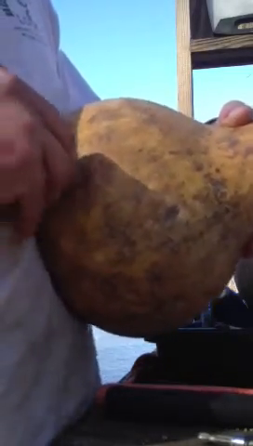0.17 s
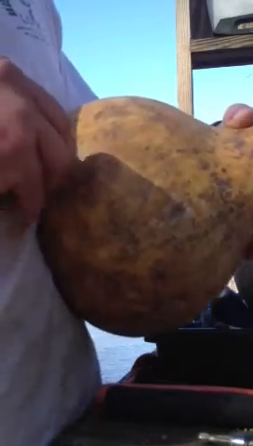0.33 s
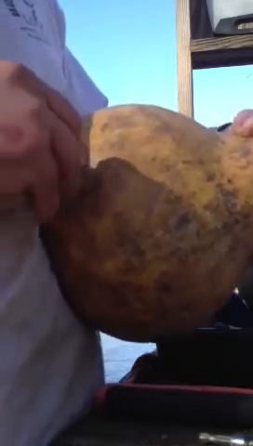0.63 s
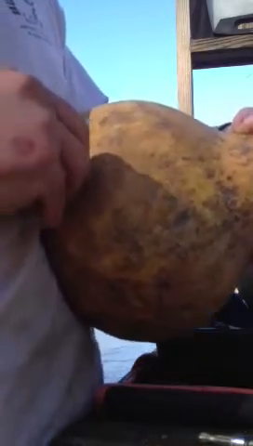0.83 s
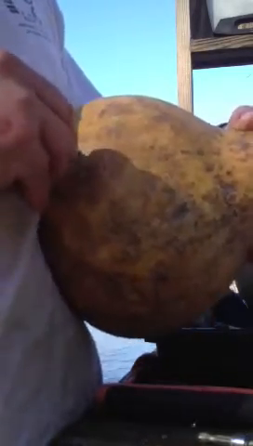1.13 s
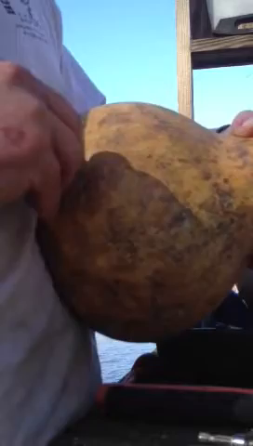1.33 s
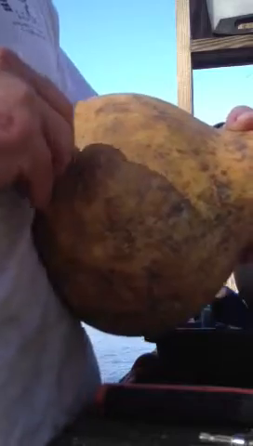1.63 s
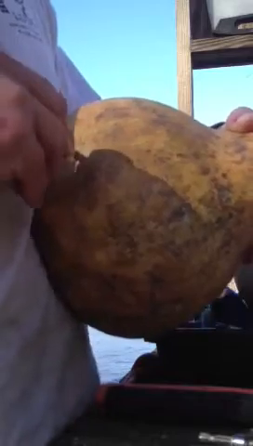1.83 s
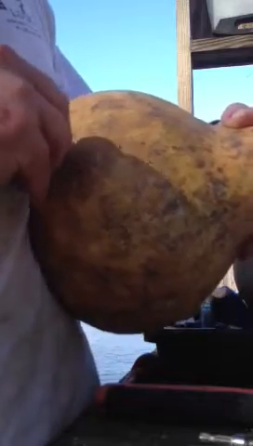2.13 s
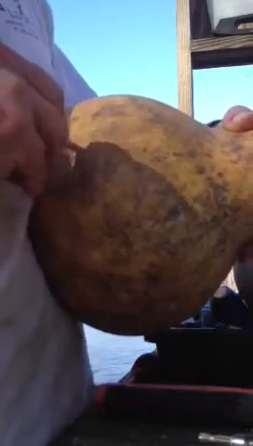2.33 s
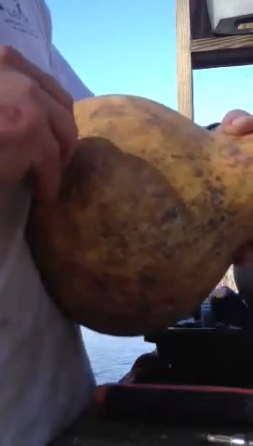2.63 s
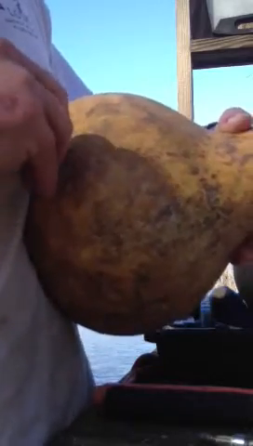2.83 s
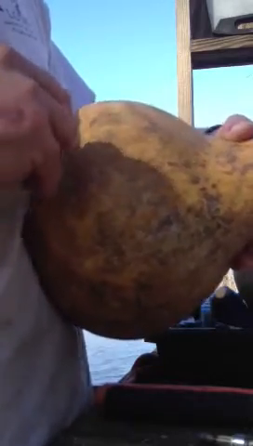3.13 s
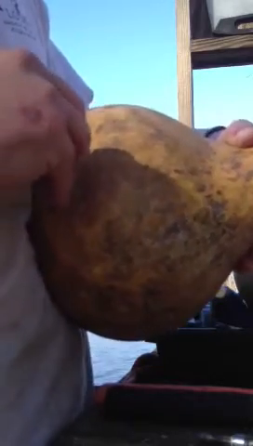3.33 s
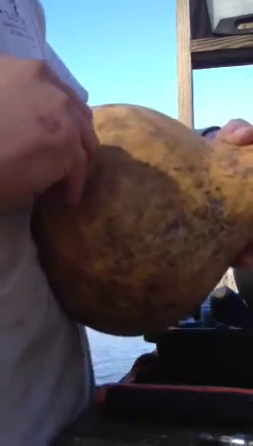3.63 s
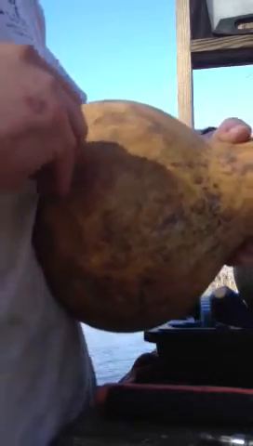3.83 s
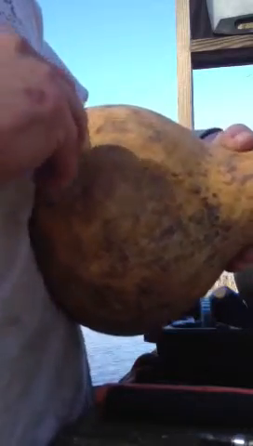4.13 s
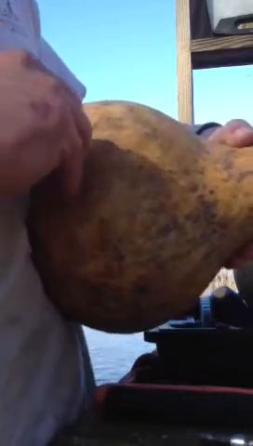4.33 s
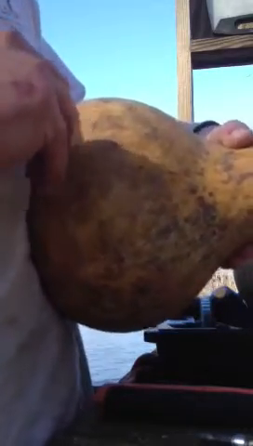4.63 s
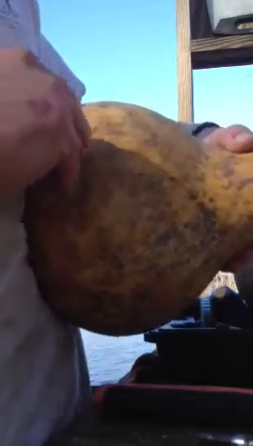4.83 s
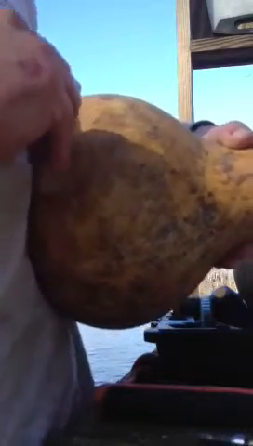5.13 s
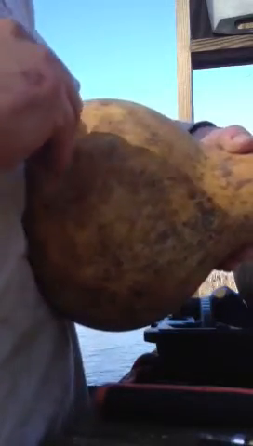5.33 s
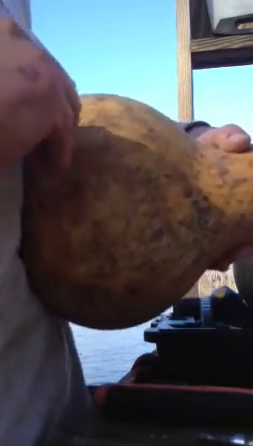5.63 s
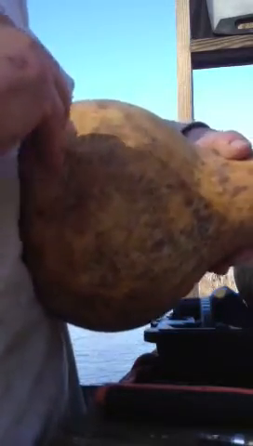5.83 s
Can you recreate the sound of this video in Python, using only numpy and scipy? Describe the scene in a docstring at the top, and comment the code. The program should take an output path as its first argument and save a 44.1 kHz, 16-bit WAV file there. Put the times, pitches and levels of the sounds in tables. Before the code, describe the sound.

A thin saw blade works through a dried gourd very close to the microphone. Short stuttering rasps, each well under a tenth of a second or so, come a few times per second with pauses between, mixed with hollow knocks and bright chip cracks. Early strokes are tighter and higher; later ones are lower, looser and stronger. The space is dry with only a trace of short reflection and very faint wavering air behind.

```python
"""A hand saw cuts a dried gourd's hard shell in short strokes, close by; air wavers faintly throughout.
From the first stroke the blade chatters (stick-slip knocks) and rasps (grit noise through shell modes).
Single snags and light blade ticks follow: each knocks the hollow body, clacks the wall, cracks a chip.
Soft rubs (narrow-band noise) and faint ticks sound among and under the strokes; a small room answers.
The chatter sinks from about 590 to 250 Hz as the cut loosens the rim."""
import sys
import numpy as np
from scipy import signal
from scipy.fft import rfft, irfft, next_fast_len
from scipy.io import wavfile
from scipy.ndimage import uniform_filter1d, map_coordinates

SR = 44100
rng = np.random.default_rng(int(sys.argv[2]) if len(sys.argv) > 2 else 0)


def put_to_file(sound):
    """Save the sound as 16-bit audio at rate SR, in the file named by the first command-line argument."""
    columns = np.atleast_2d(sound).T  # one column per channel
    safe = np.clip(columns, -1, 1)
    whole_steps = np.round(safe * 32767)
    wavfile.write(sys.argv[1], SR, whole_steps.astype(np.int16))


N = 263718

# blade runs: start t/s, fastest t/s, end t/s, then at top speed: chatter level/dB, rasp level/dB,
# passing-tooth crack level/dB; roughness/1 (about 0.5 to 1)
STROKE_RUNS = [(0.074, 0.136, 0.187, -26, -37, -46, 0.68), (0.366, 0.391, 0.45, -29.5, -34.5, -45, 0.82),
               (0.7, 0.762, 0.802, -34, -40.5, -48, 0.93), (0.931, 0.959, 1.0, -64, -54.5, -61, 1.03),
               (1.001, 1.019, 1.047, -34.5, -43.5, -44.5, 0.9),
               (1.387, 1.432, 1.462, -33.5, -39.5, -41.5, 0.84),
               (1.649, 1.69, 1.735, -19.5, -26.5, -28.5, 0.68),
               (1.849, 1.922, 1.958, -23.5, -35.5, -37, .75), (2.161, 2.208, 2.265, -21, -26, -28.5, 0.71),
               (2.424, 2.473, 2.498, -14.5, -28.5, -33.5, .5), (2.903, 2.956, 3.01, -30, -31, -32.5, 0.7),
               (3.513, 3.535, 3.568, -24.5, -33, -36.5, 0.73),
               (3.808, 3.826, 3.845, -39.5, -44, -45.5, 0.81), (3.917, 3.98, 4.016, -26, -35.5, -32, .8),
               (4.194, 4.259, 4.29, -22.5, -33.5, -44, 0.76), (4.509, 4.539, 4.582, -28, -30.5, -33, 0.75),
               (4.81, 4.838, 4.866, -16, -32, -39, 0.53), (5.124, 5.153, 5.203, -18, -26, -25.5, 0.66),
               (5.384, 5.44, 5.468, -23, -35.5, -37, 0.56), (5.681, 5.727, 5.792, -19, -28.5, -29.5, .6)]
# single snags and light blade ticks: t/s, knock level/dB, chip crack level/dB
SNAGS = [(0.263, -49, -51), (0.323, -33.5, -48), (0.34, -22.5, -37), (0.344, -17.5, -37.5),
         (0.376, -15.5, -28.5), (0.396, -15, -25.5), (0.418, -22.5, -36.5), (0.73, -32, -42),
         (1.012, -34, -38.5), (1.053, -18.5, -33), (1.099, -28.5, -39.5), (1.284, -74, -47.5),
         (1.4, -38, -48), (1.435, -26, -36.5), (1.636, -21.5, -32), (1.655, -38, -22),
         (1.682, -22.5, -20.5), (1.689, -12.5, -21.5), (1.87, -28.5, -48), (1.911, -15.5, -39.5),
         (2.075, -41, -47.5), (2.135, -66, -49.5), (2.153, -49.5, -28.5), (2.169, -18, -23),
         (2.188, -19, -22.5), (2.831, -43, -39.5), (2.85, -45.5, -40.5), (2.909, -49, -21),
         (2.918, -50, -18.5), (2.933, -12, -29.5), (2.956, -12, -24), (2.972, -17.5, -26.5),
         (3.782, -28, -41.5), (3.81, -14, -30.5), (3.925, -10.5, -26), (3.939, -9.5, -27.5),
         (3.968, -15, -28.5), (4.471, -67.5, -38.5), (4.514, -26.5, -39.5), (4.538, -13.5, -25),
         (4.823, -22.5, -46), (4.868, -47, -34.5), (5.008, -43.5, -59.5), (5.084, -68, -52.5),
         (5.113, -20.5, -37.5), (5.135, -16, -27.5), (5.166, -13.5, -26), (5.422, -20, -43),
         (5.439, -28, -28), (5.624, -42, -60.5), (5.652, -59, -41), (5.689, -13.5, -33.5),
         (5.715, -25, -26.5), (5.742, -19.5, -22), (5.756, -18, -27.5), (5.769, -21, -28.5),
         (5.973, -30.5, -45)]
# rim loosening as the cut deepens: t/s, chatter f/Hz
RIM_PITCH = [(0, 590.8), (3.5, 418.5), (5.8, 250)]
# shell wall modes: f/Hz, width before its lower limit/Hz, relative level stiff/dB, loose/dB
SHELL_MODES = [(864, 63, 3.5, -5.5), (1002, 28, -11.5, 9.5), (1143, 16, -5.5, 5), (1266, 50, -10, 13),
               (1369, 74, -4, 3.5), (1445, 100, 11.5, 2.5), (1615, 78, 4, -4), (1777, 82, 5, 4.5),
               (1901, 78, 4.5, -3), (2077, 57, 5.5, -19), (2285, 71, 2, -12.5), (2462, 280, 4.5, -16),
               (2640, 150, -2.5, -2.5), (2760, 100, 4, -1), (2970, 160, -5, -2.5), (3220, 49, -21.5, -21.5)]
# breaking-chip spectrum: f/Hz, relative level with stiff rim/dB, loose/dB
CHIP_SPECTRUM = [(2460, -25.5, -27), (3650, -8.5, -11), (3970, 4.5, 7.5), (4170, -9, -3.5), (5200, -3.5, 6),
                 (5540, -2, 0.5), (7050, 1, 4), (7150, -1, -1.5), (8700, 1, 0), (9800, -6.5, -7),
                 (11530, -0.5, -3), (13300, -6.5, -11), (14800, -8, -7), (16000, 0, -13)]
# hollow gourd resonances: f/Hz, width/Hz, relative level with stiff rim/dB, loose/dB
HOLLOW_MODES = [(200, 6.7, -16, -18.5), (323, 100, 4.5, -3.5), (434, 23, -6.5, -2), (484, 15, -13, -14),
                (543, 20, -8, -14), (580, 9, -27.5, -28), (770, 20, -17, -19.5)]
# thin steel blade modes: f/Hz, width before its lower limit/Hz, relative level/dB
BLADE_MODES = [(5500, 27, -5), (6500, 160, -3.5), (7530, 21, 6.5), (7900, 34, 3.5), (8220, 70, -5.5),
               (12800, 120, 4.5), (14300, 220, 1.5)]
# soft rubs among and under the strokes: start t/s, end t/s, f/Hz, width/Hz, peak level/dB
SOFT_RUBS = [(0.919, 0.955, 830, 50, -55), (2.8, 2.949, 762, 89.5, -49), (3.398, 3.47, 2150, 90, -71.5),
             (4.505, 5.136, 5450, 351, -71.5)]
# room decay: f/Hz, t60/s
ROOM_DECAY = [(150, 0.21), (500, 0.14), (2500, 0.033), (8000, 0.061), (15000, 0.099)]
# background spectrum: f/Hz, relative level/dB
AIR_SPECTRUM = [(18, -68), (30, -35), (92, -23), (123, 3), (389, -4.5), (546, -4), (591, -1.5),
                (921, -13.5), (3230, -16.5), (5040, -21.5), (8060, -20), (10200, -27.5), (13300, -21.5),
                (15500, -27.5)]
# background loudness before wavering: t/s, level/dB
AIR_LEVEL = [(0, -58), (0.4, -60.5), (1.85, -60.5), (3.3, -65.5), (4.5, -62), (5.98, -61)]

TOP_HZ = 15250
RING_S = np.arange(SR // 8) / SR  # time after a snap
LOOSE_HZ = 257.6  # chatter pitch of a fully loosened rim
TEETH_PER_S, TOOTH_SCATTER_S = 85, .002
TOOTH_KNOCK_DB, TOOTH_SPREAD_DB = 8, 3  # knock over crack; spread from tooth to tooth
TICKS_PER_S, TICK_DB, TICK_SPREAD_DB = 3.2, -64.5, 3
CLACK_DB, CLACK_DB_PER_KNOCK_DB = 4, 0.2  # loose wall's clack over crack; share set by the knock
HARDNESS_DB_PER_OCT, SOFTENING_PER_DB = 5.5, .45  # clack tilt; its fall per dB of knock over crack
STIFF_LOSS_DB_PER_OCT = 3.5  # a stiff wall clacks less, per octave of chatter pitch
DUST_DB = -4.5  # dust hiss re rasp
CHATTER_EXPONENT = 1.36  # chatter gain as a power of blade speed


def catches(rows):
    """Each snag or tick knocks the gourd, clacks its wall, cracks a chip; heavy knocks clack duller."""
    out = np.zeros(N)
    for s, knock_db, crack_db in rows:
        hz = rim_hz(s) * np.exp(0.022 * rng.standard_normal())
        weight_db = knock_db - crack_db
        stiff_loss_db = STIFF_LOSS_DB_PER_OCT * np.log2(hz / LOOSE_HZ)
        clack_db = crack_db + CLACK_DB + CLACK_DB_PER_KNOCK_DB * weight_db - stiff_loss_db
        hardness = HARDNESS_DB_PER_OCT - SOFTENING_PER_DB * weight_db
        thump = knock(hz, swell_cycles=0.53, hollow_db=-12.5)
        clack_force = fracture(t60_s=0.016, tail_db=-10.0, tail_t60_s=0.064, spike=1.3)
        clack = wall(clack_force, hz, hardness)
        crack_force = fracture(t60_s=0.0042, tail_db=-9.5, tail_t60_s=0.05, spike=0.56)
        crack = chips(crack_force, hz)
        for db, part in (knock_db, thump), (clack_db, clack), (crack_db, crack):
            add(out, s, amp(db) * unit(part, count=176))  # level over the first 4 ms
    return out


def strokes():
    """The running blade sticks and slips roughly in step with the rim; slips knock it and scrape grit."""
    out = np.zeros(N)
    for start, fastest, end, chatter_db, rasp_db, _, rough in STROKE_RUNS:
        t = np.arange(int((end - start) * SR)) / SR
        speed = blade_speed(start + t, start, fastest, end)
        hz = rim_hz(fastest)
        turns = np.cumsum(hz * np.exp(.2 * rough * wobble(300, t))) / SR
        bite = amp(5.2 * rough * wobble(330, t))  # teeth bite unevenly
        slips = bite * np.diff(np.floor(turns), prepend=0)
        scraping = bite * amp(4.5 * np.cos(2 * np.pi * turns))
        chatter = unit(ringing(slips, knock(hz, swell_cycles=0.99, hollow_db=-8.5)))
        # teeth tearing out of step shake the whole hollow body
        stray_force = scraping * rng.standard_normal(len(t))
        stray = unit(ringing(stray_force, knock(0.8 * hz, swell_cycles=0.24, hollow_db=1.5)))
        rasp = wall(grit(scraping, breaks_per_s=1200, spread_db=3.0, dust=0.42), hz)
        hiss = chips(grit(scraping, breaks_per_s=2400, spread_db=4.0, dust=0.72), hz)
        chatter_gain = amp(chatter_db) * speed ** CHATTER_EXPONENT
        add(out, start, chatter_gain * unit(chatter + rough * stray))
        add(out, start, amp(rasp_db) * speed * (unit(rasp) + amp(DUST_DB) * unit(hiss)))
    return out


def teeth(count=16):
    """Teeth catch in turn, hardest at top speed: rows (t/s, knock level/dB, crack level/dB)."""
    rows = []
    snag_s = np.transpose(SNAGS)[0]
    for start, fastest, end, _, _, tooth_db, _ in STROKE_RUNS:
        late, knock_luck, crack_luck = rng.standard_normal((3, count))
        times = start + (np.arange(count) + .5) / TEETH_PER_S + TOOTH_SCATTER_S * late
        db = tooth_db + 20 * np.log10(blade_speed(times, start, fastest, end) + 1e-9)
        # a listed snag or tick replaces teeth within half a tooth interval
        free = np.abs(times[:, None] - snag_s).min(axis=1) > .5 / TEETH_PER_S
        knock_db = db + TOOTH_KNOCK_DB + TOOTH_SPREAD_DB * knock_luck
        crack_db = db + TOOTH_SPREAD_DB * crack_luck
        passing = np.column_stack([times, knock_db, crack_db])
        rows += list(passing[free & (times < end)])
    return rows


def knock(hz, swell_cycles, hollow_db):
    """The freed rim swings a couple of times, damped by the hands, and shakes the hollow gourd."""
    cycles = hz * RING_S
    swing = cycles * np.exp(-cycles / swell_cycles) * np.cos(2 * np.pi * cycles)
    hollow = resonances(blend(HOLLOW_MODES, hz))
    body = swing / np.abs(rfft(swing)).max() + amp(hollow_db) * hollow
    # a small body radiates little bass; its slow swing holds no treble
    band = signal.butter(2, [170, 900], "band", fs=SR, output="sos")
    return signal.sosfilt(band, -body)


def wall(x, hz, hardness=0, scatter_db=3.0):
    """Woody shell answer: each contact favours other modes; hardness (dB/octave) lifts the higher ones."""
    modes = blend(SHELL_MODES, hz)
    modes[:, 1] = np.maximum(modes[:, 1], 55)  # no mode rings longer than a 55 Hz width allows
    tilt_db = hardness * np.log2(modes[:, 0] / 2000)
    modes[:, 2] += tilt_db + scatter_db * rng.standard_normal(len(modes))
    band = signal.butter(2, [950, 3500], "band", fs=SR, output="sos")
    return signal.sosfilt(band, ringing(x, resonances(modes)))


def chips(x, hz):
    """Bright sound of breaking fibres, with a little ring from the blade."""
    bright = coloured(x, blend(CHIP_SPECTRUM, hz))
    # pinched in the kerf, no blade mode rings longer than a 115 Hz width allows
    pinched = [(f, max(width, 115), db) for f, width, db in BLADE_MODES]
    return bright + ringing(bright, resonances(pinched))


def fracture(t60_s, tail_db, tail_t60_s, spike):
    """Force of a breaking chip: sharp spike, short crumble, weak tail."""
    decay = amp(-60 * RING_S / t60_s) + amp(tail_db - 60 * RING_S / tail_t60_s)
    force = rng.standard_normal(len(RING_S)) * decay
    force[np.searchsorted(RING_S, .0005)] += spike
    return force


def grit(gate, breaks_per_s, spread_db, dust):
    """Force of tiny fractures of very unequal size, on a bed of fine dust."""
    n = len(gate)
    hits = rng.random(n) < breaks_per_s / SR
    breaks = hits * rng.choice([-1, 1], n) * amp(spread_db * rng.standard_normal(n))
    return gate * (unit(breaks) + dust * rng.standard_normal(n))


def rim_hz(s):
    """Chatter pitch at time s; it falls as the rim loosens."""
    return np.interp(s, *np.transpose(RIM_PITCH))


def blend(table, hz):
    """Merge stiff and loose columns: the lower the chatter, the looser the rim."""
    loose = np.clip(1 - np.log2(hz / LOOSE_HZ), 0, 1) ** 0.77
    table = np.array(table, float)
    level_db = (1 - loose) * table[:, -2] + loose * table[:, -1]
    return np.column_stack([table[:, :-2], level_db])


def blade_speed(s, start, fastest, end):
    """The hand speeds the blade up from rest and brakes it again (0-1)."""
    return np.sin(np.interp(s, [start, fastest, end], [0, np.pi / 2, np.pi])) ** 2


def rubs():
    """Soft narrow-band rubbing: resonated noise that swells and fades."""
    out = np.zeros(N)
    for start, end, hz, width, db in SOFT_RUBS:
        n = int((end - start) * SR)
        tone = unit(ringing(rng.standard_normal(n), resonances([(hz, width, 0)])))
        add(out, start, amp(db) * np.hanning(n) * tone)
    return out


def ticks(count=40):
    """The blade shifts lightly in the kerf at random: rows (t/s, knock level/dB, crack level/dB)."""
    times = (np.arange(count) + rng.random(count)) / TICKS_PER_S
    levels_db = TICK_DB + TICK_SPREAD_DB * rng.standard_normal((count, 2))
    return list(np.column_stack([times, levels_db])[times < N / SR])


def room(x):
    """Short workspace answer: noise tail with frequency-dependent decay, 200 samples late."""
    hz, t, z = signal.stft(rng.standard_normal(SR // 2), SR, nperseg=256)
    decay = amp(-60 * t / along(ROOM_DECAY, hz)[:, None])
    tail = signal.istft(z * decay, SR, nperseg=256)[1]
    return signal.fftconvolve(np.pad(x, (200, 0)), tail / np.linalg.norm(tail))[:N]


def background(patchy_db):
    """Faint ambience: coloured noise wavering in level and colour."""
    t = np.arange(N) / SR
    z = signal.stft(rng.standard_normal(N), nperseg=512)[2]
    patches = uniform_filter1d(rng.standard_normal(z.shape), size=5, axis=0)  # across frequency
    patches = uniform_filter1d(patches, size=12, axis=1)  # across time
    air = signal.istft(z * amp(patchy_db * unit(patches)), nperseg=512)[1][:N]
    level_db = np.interp(t, *np.transpose(AIR_LEVEL)) + 1.5 * wobble(3.3, t)
    return amp(level_db) * unit(coloured(air, AIR_SPECTRUM))


def resonances(modes):
    """Impulse response: sum of decaying cosines from (f/Hz, width/Hz, level/dB)."""
    out = np.zeros(len(RING_S))
    for hz, width, db in modes:
        decay = np.exp(-np.pi * width * RING_S)
        out += amp(db) * 2 * np.pi * width / SR * decay * np.cos(2 * np.pi * hz * RING_S)
    return out


def ringing(x, response):
    """Convolve x with a response, keeping its length."""
    return signal.fftconvolve(x, response)[:len(x)]


def coloured(x, points, size=2048):
    """Filter x to the given spectrum, minimum phase via the folded cepstrum."""
    cepstrum = irfft(np.log(amp(along(points, np.fft.rfftfreq(size, 1 / SR)))))
    cepstrum[1:size // 2] *= 2
    cepstrum[size // 2 + 1:] = 0
    return ringing(x, irfft(np.exp(rfft(cepstrum))))


def along(points, hz):
    """Interpolate (f/Hz, value) points on a log-frequency axis."""
    f, v = np.transpose(points)
    return np.interp(np.log(hz + 1), np.log(f + 1), v)


def wobble(knots_per_s, t):
    """Smooth random curve over times t."""
    knots = rng.standard_normal(int(t[-1] * knots_per_s) + 4)
    return map_coordinates(knots, [t * knots_per_s], mode="nearest")


def amp(db):
    """Decibels to gain."""
    return 10 ** (np.asarray(db) / 20)


def unit(x, count=None):
    """Scale x so that its first count samples (default all) have rms 1."""
    return x / np.sqrt(np.mean(x[:count] ** 2) + 1e-20)


def add(track, s, x):
    """Mix x into the track at time s."""
    start = max(0, round(s * SR))
    part = track[start:start + len(x)]
    part += x[:len(part)]


def scene():
    """Snags, strokes, rubs, teeth and ticks sound into the room, over the background."""
    air = background(patchy_db=2.0)
    saw = catches(SNAGS) + strokes() + rubs() + catches(teeth() + ticks())
    return (saw + amp(-22) * room(saw) + air)[None]


def record(dry):
    """Steep zero-phase low-pass at TOP_HZ."""
    size = next_fast_len(N + SR // 4)
    gain = 1 / np.sqrt(1 + (np.fft.rfftfreq(size, 1 / SR) / TOP_HZ) ** 240)
    return irfft(rfft(dry, size) * gain, size)[:, :N]


dry = scene()
out = record(dry)
put_to_file(out)
```